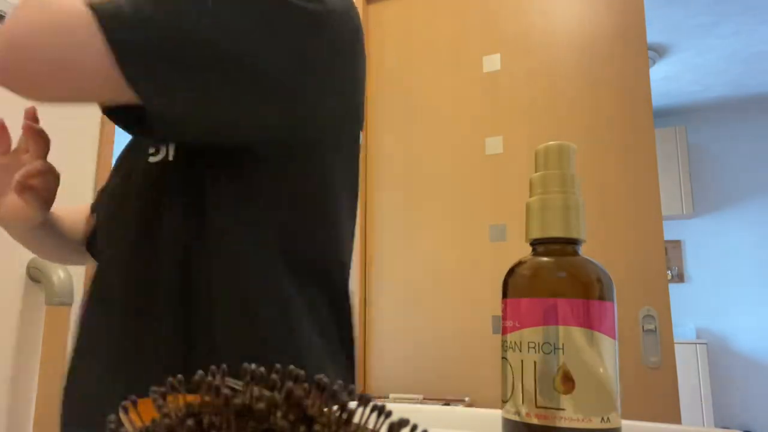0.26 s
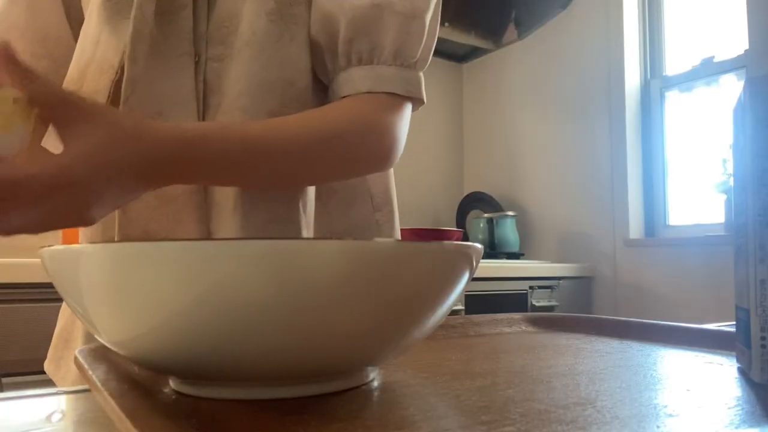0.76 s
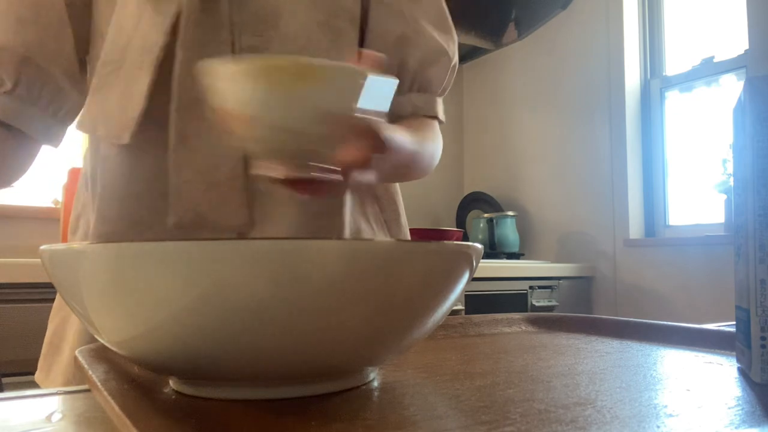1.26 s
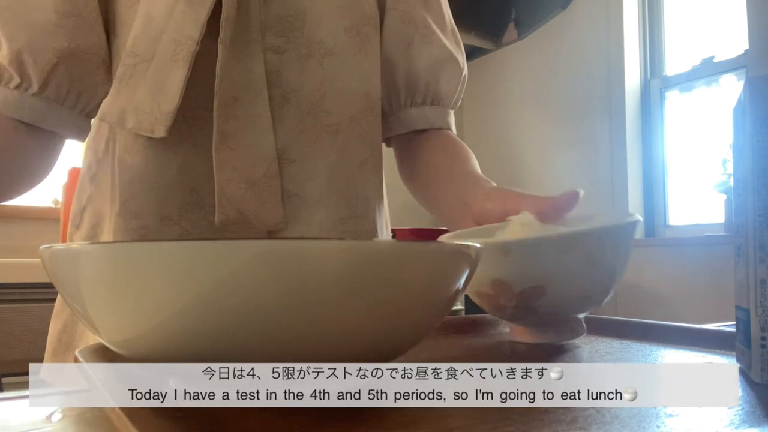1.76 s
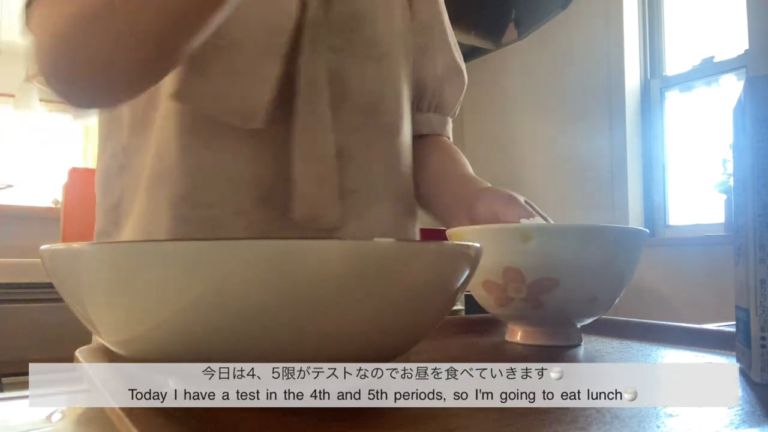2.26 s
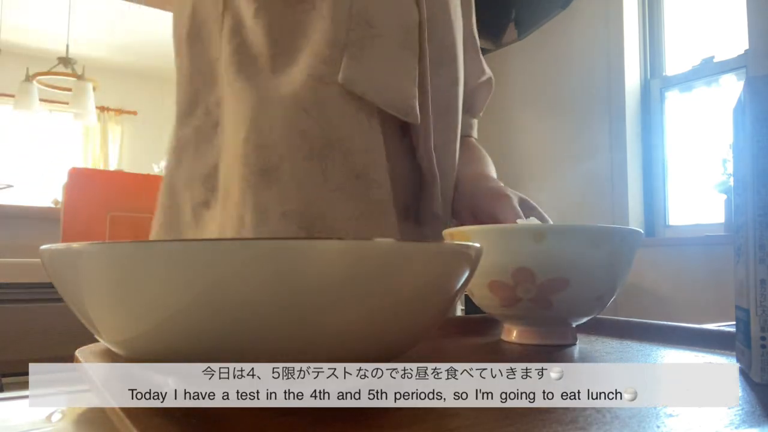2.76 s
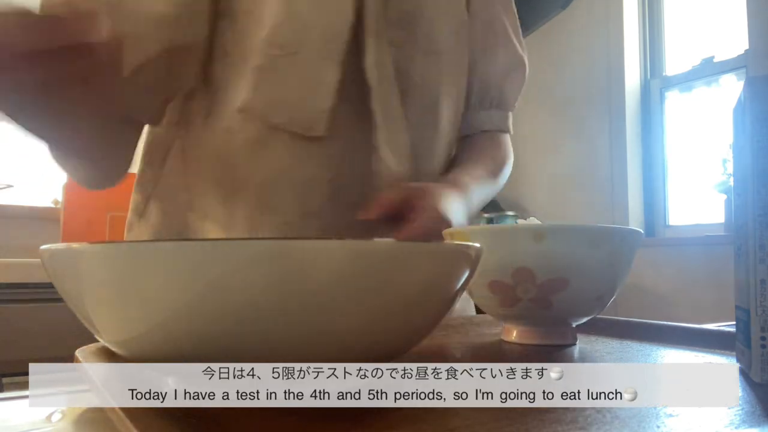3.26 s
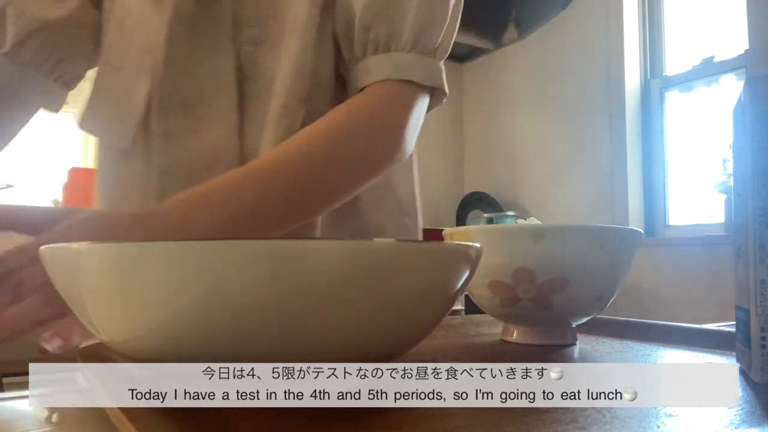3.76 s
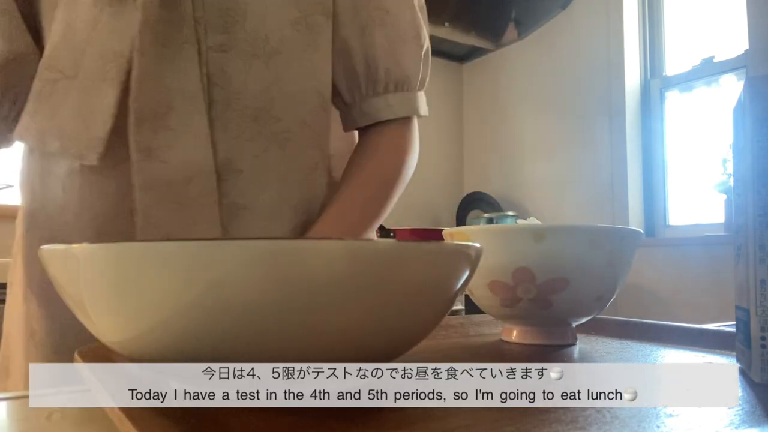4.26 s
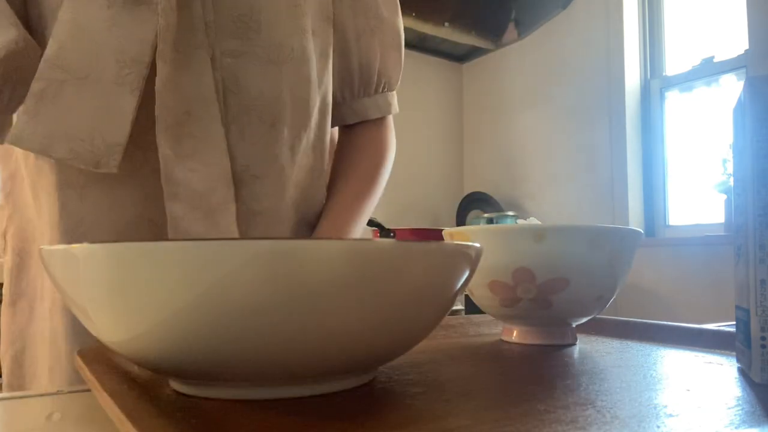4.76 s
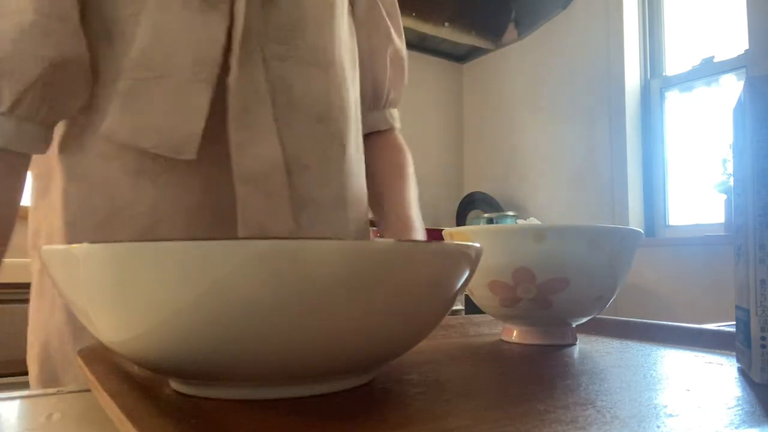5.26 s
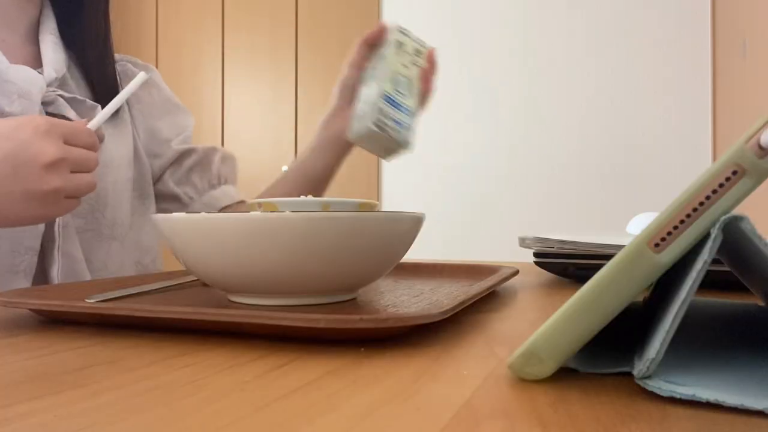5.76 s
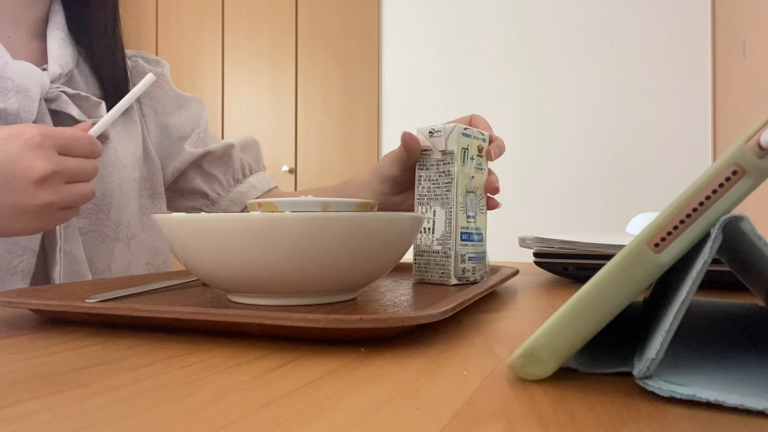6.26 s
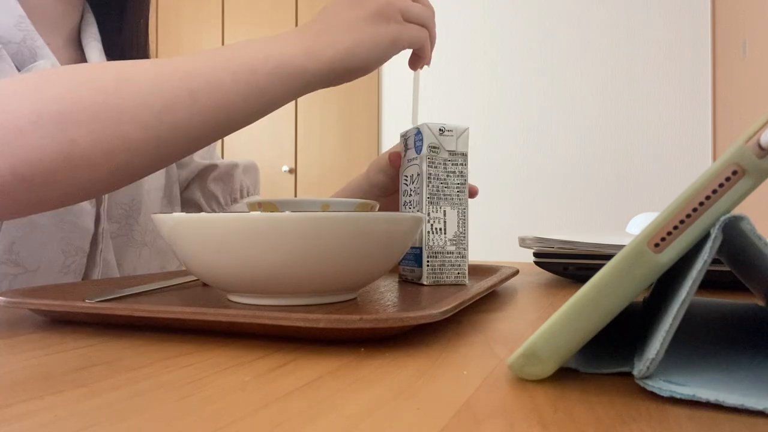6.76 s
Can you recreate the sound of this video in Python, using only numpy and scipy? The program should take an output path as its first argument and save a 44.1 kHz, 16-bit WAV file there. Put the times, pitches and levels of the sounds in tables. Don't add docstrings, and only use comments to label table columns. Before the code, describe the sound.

A brief soft hall hush with faint pipe tones cuts to a kitchen with a low extractor hum. A ceramic bowl strikes wood twice, hard, and settles; chopsticks tap and clack down; a drawer knocks, slides and rattles cutlery. The hum cuts off abruptly into a quiet dining room: crisp wrapper snaps, a dull carton thump on a tray, a faint clock ticking. Close phone microphone on the surface, slight room echo.

```python
import sys
import numpy as np
from scipy import signal
from scipy.fft import rfft, irfft, next_fast_len
from scipy.io import wavfile
from scipy.ndimage import uniform_filter1d

SR = 44100
rng = np.random.default_rng(int(sys.argv[2]) if len(sys.argv) > 2 else 0)


def master_out(mix):
    frames = np.transpose(np.atleast_2d(mix))
    ceiling = np.clip(frames, -1, 1)
    pcm = np.round(ceiling * 32767).astype(np.int16)
    wavfile.write(sys.argv[1], SR, pcm)


def level_to_linear(level):
    exponent = np.asarray(level, float) / 20
    return 10 ** exponent


N = 309141
T = np.arange(N) / SR


def column(table, hz, size=1):
    table = np.array(table)
    return np.interp(np.log(np.maximum(hz, 1)), np.log(table[:, 0]), table[:, size])


def tilt(table, size):
    return level_to_linear(column(table, np.fft.rfftfreq(size, 1 / SR)))


def lean(pan_db):
    return level_to_linear(np.array([[pan_db], [-pan_db]]) / 2)


def add(out, s, pair):
    i = int(s * SR)
    out[:, i:i + pair.shape[1]] += pair[:, :N - i]


def colour(x, table):
    y = irfft(rfft(x) * tilt(table, x.shape[-1]), x.shape[-1])
    return y / y.std()


def band(x, lo_hz, hi_hz):
    edges_hz = [lo_hz, min(hi_hz, SR / 2.2)]
    y = signal.sosfilt(signal.butter(2, edges_hz, "bandpass", fs=SR, output="sos"), x)
    return y / y.std()


def dull(x, top_hz):
    return signal.sosfilt(signal.butter(6, min(top_hz, SR / 2.2), fs=SR, output="sos"), x)


def walk(rate, size=N):
    k = int(SR / rate)
    held = np.repeat(rng.standard_normal(size // k + 1), k)
    return 1.3 * uniform_filter1d(uniform_filter1d(held, k), k)[:size]


def gestures(events, rise_db_s, fall_db_s, size=2, count=16):
    t = T[::count]
    gain = 0
    for e in events:
        before_s = np.maximum(e[0] - t, 0)
        after_s = np.maximum(t - e[0] - e[1], 0)
        gain = gain + level_to_linear(e[size] - rise_db_s * before_s - fall_db_s * after_s)
    return np.interp(T, t, gain)


def near(size):
    a, b = rng.standard_normal((2, size))
    like = 0.78
    return np.array([a, like * irfft(1j * rfft(a), size) + np.sqrt(1 - like ** 2) * b])


# centre_hz, likeness (-1..1), left_minus_right_db
PORTS = [(60, 1, -3.5), (152, 0.67, -5.5), (300, 0.58, 0.5), (680, -0.56, -0.5), (1400, 0.036, -1.5),
         (3000, -0.17, -0.5), (8000, 0.65, 2.5)]


def bands(table, size):
    octave = np.log2(np.maximum(np.fft.rfftfreq(size, 1 / SR), 1))
    mid, side = rfft(rng.standard_normal((2, size))) * tilt(table, size)
    for centre in np.arange(np.log2(30), np.log2(17000), 1 / 2):
        hz = 2 ** centre
        shape = np.cos(np.pi * np.clip(octave - centre, -1 / 2, 1 / 2)) ** 2
        like = np.clip(column(PORTS, hz), -1, 1)
        m, s = np.sqrt(1 + like) * mid, np.sqrt(1 - like) * side
        yield hz, lean(column(PORTS, hz, size=2)) * irfft(shape * np.array([m + s, m - s]), size)


def rings(events):
    out, t = np.zeros((2, N)), np.arange(SR // 7) / SR
    for s, db, hz, t60, pan_db in events:
        turn = np.arccos(np.clip(column(PORTS, hz), -1, 1)) * np.array([[0], [1]])
        turn = turn + 0.92 * walk(120, size=len(t))
        swell = level_to_linear(db - 60 * t / max(t60, .005)) * (1 - np.exp(-t * hz))
        add(out, s, swell * np.sin(2 * np.pi * hz * t + turn) * lean(pan_db))
    return out


def clicks(events, spread, ring_s):
    out, t = np.zeros((2, N)), np.arange(SR // 5) / SR
    for s, db, hz, pan_db in events:
        snap = band(near(len(t)), hz / spread, hz * spread) * np.exp(-t / ring_s)
        add(out, s, snap / abs(snap).max() * level_to_linear(db) * lean(pan_db))
    return out


def blows(events, modes, crack_s, crack_hz, crack_db_more, grit_s, grit_db, board_pan_db, body_db_more,
          bend=.045, cycles=280):
    out, t = np.zeros((2, N)), np.arange(SR // 5) / SR
    hz, db, t60 = (c[:, None] for c in np.transpose(modes))
    t60 = np.minimum(t60, cycles / hz)
    part = np.searchsorted([280, 900, 2800], hz[:, 0])  # board, body, ring, crack (Hz)
    for s, ring_db, board_db, crack_db, pan_db in events:
        body_db = (ring_db + board_db) / 2 + body_db_more
        chance = rng.standard_normal((3, len(modes), 1))
        noise = colour(np.array([near(len(t)) for _ in range(3)]), modes)
        late = np.maximum(t - bend / np.sqrt(hz), 0)
        decay = level_to_linear(db + 3.4 * chance[0] - 60 * late / np.maximum(t60, .01))
        swell = (1 - np.exp(-late * hz / 0.87)) * decay
        phase = 2 * np.pi * hz * (1 + 0.0053 * chance[1]) * late
        turn = np.arccos(np.clip(column(PORTS, hz), -1, 1)) * (1 + 0.22 * chance[2])
        sound = swell * np.array([np.sin(phase), np.sin(phase + turn)])
        board, body, ring, crack = (sound[:, part == k].sum(axis=1) for k in range(4))
        grit = level_to_linear(grit_db) * np.exp(-t / grit_s) * (1 - np.exp(-t / 0.0011))
        body = body / abs(body).max() + grit * band(noise[0], 210, 900)
        ring = ring / abs(ring).max() + grit * band(noise[1], 690, 2500)
        snap = band(noise[2] + 6 * (t == 0), 2700, crack_hz) * np.exp(-t / crack_s)
        crack = crack / abs(crack).max() + level_to_linear(crack_db_more) * snap
        parts = [(board * lean(board_pan_db), board_db + 7), (body * lean(board_pan_db), body_db + 12.0),
                 (ring, ring_db), (crack, crack_db + 5.5)]
        add(out, s, lean(pan_db) * sum(p / abs(p).max() * level_to_linear(d) for p, d in parts))
    return out


# centre_hz, wander_db
FLICKER = [(300, 2.5), (2000, 0.5), (9000, 1.7), (12000, 1.5)]


def air(table, db, size, pan_db):
    out = 0
    for hz, pair in bands(table, next_fast_len(size)):
        out = out + level_to_linear(column(FLICKER, hz) * walk(2.96, size=size)) * pair[:, :size]
    return out / out.mean(axis=0).std() * level_to_linear(db) * lean(pan_db)


# pitch_hz, level_db, waver_db, left_minus_right_db, left_lead_rad
FAN_TONES = [(59.75, -40.6, .3, -1.5, 0), (170.5, -39.5, .8, -5, -.45), (240, -51.5, 2, -5, -.1),
             (2199, -69.5, 2, -2, 2.2), (150, -52, 3, -5, -.4), (87, -62, 3, -2, 0), (299, -61, 3, -2, -.5),
             (345, -58, 3, 0, -.8), (2390, -80, 3, -2, 2.6), (1728, -81, 3, -3, 2.6)]
# low_hz, high_hz
WHINE_HZ = (2250, 2450)


def fan():
    out = 0
    sides = np.array([[1], [-1]]) / 2
    for hz, db, waver_db, pan_db, lead in FAN_TONES:
        phase = 2 * np.pi * hz * T + 0.39 * waver_db * walk(5)
        level = np.sqrt(2) * level_to_linear(db + waver_db * walk(8.4))
        out = out + level * lean(pan_db) * np.sin(phase + lead * sides)
    return out + level_to_linear(-72.5 + 2 * walk(9.9)) * band(rng.standard_normal((2, N)), *WHINE_HZ)


# start_s, peak_db, pitch_hz, t60_s, left_minus_right_db
LATE_RINGS = [(.005, -57, 715, .25, 0), (.082, -55, 720, .2, 2), (.15, -59, 626, .25, 0),
              (.24, -62, 604, .25, -2), (.3715, -52, 620, .02, 1), (1.6124, -16, 1335, .07, -4.5),
              (1.6126, -20.5, 987.5, .07, -4.5), (1.6124, -22, 3210, .025, -3),
              (1.7203, -17, 994, .12, -4.5), (1.7203, -19, 1586, .06, -3), (1.7205, -24.5, 4475, .03, -2),
              (1.734, -24.5, 1320, 0.13, -2.5), (2.651, -21.5, 300, 0.099, -5),
              (2.654, -46, 7880, 0.098, -2), (1.7205, -16, 904, .04, -3.5),
              (2.7055, -16, 2308, 0.044, -0.5), (2.7105, -12, 2320, .045, -1),
              (2.7055, -21, 4310, 0.027, -1), (2.7055, -29.5, 5380, 0.018, -1.5),
              (2.71, -23.5, 2980, .04, -4.5), (4.8575, -18.5, 1300, 0.031, -3),
              (4.868, -25.5, 138, 0.11, -7), (4.878, -24.5, 125.8, .1, -6.5), (6.028, -31, 840, .04, -2),
              (6.028, -31, 1690, .025, -4), (6.04, -44, 916, 0.15, -5)]
# start_s, peak_db, centre_hz, left_minus_right_db
DRY_GLINTS = [
    (.3722, -62, 9000, 0),
    (6.028, -58, 12800, 0),
    (6.043, -51, 12750, 0),
    (6.053, -64, 12800, 0),
    (6.169, -61, 2300, -3),
]


def pipes_and_late_rings():
    return rings(LATE_RINGS) + clicks(DRY_GLINTS, spread=1.3, ring_s=.002)


# start_s, hold_s, level_db
STROKES = [
    (.2, 0.12, -68),
    (.724, 0, -81),
    (1.1, 0.13, -74.5),
    (2.15, 0, -81),
    (2.24, 0, -65),
    (2.3, 0.12, -74),
    (3.01, 0.1, -77),
    (3.39, 0.15, -71),
    (4.58, 0.15, -65.5),
    (6.2, 0.0058, -71.5),
]
# start_s, hold_s, level_db
SHAKES = [
    (4.206, 0.026, -45),
    (4.542, 0.0087, -59),
    (4.762, 0.0076, -34.5),
    (4.86, 0.0025, -40),
    (5.058, 0, -58),
    (6.03, 0.018, -68),
]
# centre_hz, density_db
CLOTH_COLOUR = [(1500, -12.5), (3000, 1.5), (6000, -3.5), (9500, -3), (13000, -14.5), (15500, -17.5)]


def cloth():
    grain = level_to_linear(np.clip(1.2 * walk(23) + 2.7 * walk(600), -6, 5))
    moves = gestures(STROKES, rise_db_s=178.5, fall_db_s=167)
    moves = moves + gestures(SHAKES, rise_db_s=3003, fall_db_s=185)
    return moves * grain * colour(near(next_fast_len(N)), CLOTH_COLOUR)[:, :N]


# start_s, hold_s, rumble_db, scrape_db
DRAWER_PUSHES = [
    (4.225, 0.013, -27.5, -47.5),
    (4.42, 0.44, -49, -53),
    (4.8, 0.0085, -35, -36.5),
    (4.888, 0.012, -33, -44),
    (5.07, 0.017, -52.5, -51.5),
]
# start_s, hold_s, rumble_db, scrape_db
CARTON_PUSHES = [
    (6.04, 0.0062, -36, -42.5),
    (6.1, 0.082, -49, -49.5),
    (6.215, .01, -50, -75.5),
]
# start_s, hold_s, level_db
ROCKS = [
    (6.042, 0.013, -36),
    (6.218, 0.012, -40.5),
    (6.3, 0.023, -55),
]


def slides():
    rumble = band(rng.standard_normal(N), 64, 229) * lean(-6.5)
    noise = rng.standard_normal((2, N)) * level_to_linear(2.0 * walk(60))
    drawer_rumble, drawer_scrape = (gestures(DRAWER_PUSHES, 278, 181.5, size=k) for k in (2, 3))
    carton_rumble, carton_scrape = (gestures(CARTON_PUSHES, 3003, 181.5, size=k) for k in (2, 3))
    sway = np.sqrt(2) * np.sin(2 * np.pi * 55.3 * T) * lean(-6.5)
    return ((drawer_rumble + carton_rumble) * rumble
            + drawer_scrape * band(band(noise, 950, 1650), 950, 1655)
            + carton_scrape * band(noise, 400, 750)
            + gestures(ROCKS, rise_db_s=3003, fall_db_s=211) * sway)


CLOCK_RUNS_S = (5.6145, 6.4165)
BEAT_SCATTER_DB = [7, 3, 0, -2, -3, -3, -1, -3, -.5, -2, 3.5, -4]


def clock(count=7):
    beat_s, tock_late_s = .1251, .002
    order = [(s + k * beat_s + k % 2 * tock_late_s, k % 2) for s in CLOCK_RUNS_S for k in range(count)]
    events = []
    for (s, k), more_db in zip(order, BEAT_SCATTER_DB):
        db, hz = ((-65.5, 1900), (-67.5, 1800))[k]
        events.append((s, db + more_db, hz, 0.031, -9))
    return rings(events)


# start_s, peak_db, pitch_hz, t60_s, left_minus_right_db
TRAY_RINGS = [(4.9, -52, 4470, .015, -1), (5.581, -43.5, 4400, 0.011, -1), (5.581, -33, 6000, 0.0092, -1),
              (6.019, -41, 740, 0.068, -11), (5.5, -55, 1750, .05, 0), (6.075, -49, 1800, 0.076, -3),
              (6.07, -29, 120, 0.15, -4), (6.098, -56, 2300, 0.056, 0), (6.149, -48, 1200, 0.11, -10),
              (6.8, -41, 310, 0.051, -6)]
# start_s, peak_db, centre_hz, left_minus_right_db
TRAY_TAPS = [(5.4995, -45.5, 1305, -2), (6.0185, -47, 997, -2), (6.0272, -23.5, 1040, -3),
             (6.0274, -39.5, 2250, 4), (6.1682, -43, 975, 3), (6.1688, -35, 417, -1),
             (6.1692, -62, 2400, 4), (6.2068, -56, 1700, -3), (6.0268, -45, 3500, -2),
             (6.028, -36, 1650, 3), (6.2068, -62, 3180, -3), (6.364, -67, 2200, -5)]


def tray():
    return rings(TRAY_RINGS) + clicks(TRAY_TAPS, spread=1.16, ring_s=0.0038)


# start_s, ring_db, board_db, crack_db, left_minus_right_db
CARTON = [
    (6.0257, -25, -28.5, -56, -6),
    (6.1657, -47.5, -41, -72, -6),
    (6.206, -58, -41.5, -62, -10),
    (6.2194, -53, -44.5, -72, -1),
]
# pitch_hz, level_db, t60_s
CARTON_MODES = [(118.2, -0.5, 0.13), (131.4, 3, 0.11), (250, -17, 0.053), (406, 0, 0.039),
                (457, -2.5, 0.027), (716, -5, 0.016), (903.6, -7, 0.048), (1400, -6, 0.02),
                (2250, -13, 0.021), (3140, -15, 0.011), (3700, -20, .015), (6600, -12, .01)]
# start_s, peak_db, centre_hz, left_minus_right_db
FLAP = [
    (6.043, -42.5, 7440, 0),
    (6.053, -55, 7000, 0.0057),
]


def carton():
    landing = blows(CARTON, CARTON_MODES, crack_s=0.0023, crack_hz=4030, crack_db_more=-5, grit_s=0.0029,
                    grit_db=-2.5, board_pan_db=2.0, body_db_more=-2.5, bend=0.0895)
    return landing + clicks(FLAP, spread=1.2, ring_s=0.003)


# start_s, peak_db, centre_hz, left_minus_right_db
WRAPPER = [
    (5.473, -28, 7470, -2),
    (5.4994, -33, 3500, -1),
    (5.5814, -33.5, 8000, -1.2),
    (5.8816, -43.5, 6850, -1.2),
]
# start_s, peak_db, centre_hz, left_minus_right_db
CRINKLE = [
    (5.4728, -38, 8500, 0),
    (5.585, -47, 9400, -5),
]


def wrapper():
    snaps = clicks(WRAPPER, spread=2.4, ring_s=0.00034)
    snaps = snaps + level_to_linear(-1.0) * clicks(WRAPPER, spread=38, ring_s=0.0044)
    paper = snaps + clicks(CRINKLE, spread=1.5, ring_s=0.022)
    return np.where(T > 5.8, dull(paper, top_hz=8500), paper)


# start_s, ring_db, board_db, crack_db, left_minus_right_db
DRAWER = [
    (3.8314, -35.5, -36, -62.5, 1.7),
    (3.8506, -45, -37.5, -72, -2),
    (4.2045, -18, -28.5, -38, -1),
    (4.2834, -28, -39, -50, 0),
    (4.3511, -29.5, -38.5, -67, -2),
    (4.4344, -40.5, -54, -59, 0.82),
    (4.764, -14, -24.5, -26.5, -1),
    (4.856, -19.5, -29.5, -30, -0.21),
    (4.8895, -67, -24.5, -43.5, 0),
    (5.058, -32, -43.5, -66.5, 1),
]
# pitch_hz, level_db, t60_s
DRAWER_MODES = [(85.3, -6.5, 0.24), (135.6, 2, 0.085), (229, -7, 0.15), (322.4, -3, 0.051),
                (539.6, -3.5, 0.18), (916, -1.5, 0.18), (1210, 1, 0.047), (1348, 0, 0.097),
                (1506, -6.5, 0.16), (2370, -3, 0.059), (3720, -5, .03), (4940, -1, 0.025), (8240, 1, 0.041)]
# start_s, peak_db, centre_hz, left_minus_right_db
CUTLERY = [
    (3.6533, -51, 5420, 3),
    (3.665, -45, 5900, -3),
    (3.9072, -53, 4440, -2),
    (4.0584, -59, 3340, -6),
    (4.521, -53, 4110, 0),
    (4.5414, -31, 4360, 3),
    (4.542, -33, 2220, -1),
    (4.6963, -39, 3010, 18.5),
]
# start_s, peak_db, centre_hz, left_minus_right_db
RATTLE = [
    (4.207, -48, 11060, -2),
    (4.543, -57, 10830, 5.5),
    (4.697, -48.5, 12000, 2),
    (4.764, -20, 11400, 4),
    (4.86, -41.5, 10750, 0.5),
]
# start_s, peak_db, centre_hz, left_minus_right_db
HOLLOW = [
    (4.211, -26.5, 1400, .1),
    (4.353, -43.5, 930, -2),
    (4.7655, -35, 1340, .1),
    (4.8575, -30, 1340, 0.27),
]


def drawer():
    knocks = blows(DRAWER, DRAWER_MODES, crack_s=0.011, crack_hz=15550, crack_db_more=-11.5, grit_s=0.035,
                   grit_db=-5.5, board_pan_db=-2.5, body_db_more=-8)
    loose = clicks(CUTLERY, spread=1.45, ring_s=0.0032) + clicks(RATTLE, spread=1.4, ring_s=0.025)
    return knocks + loose + clicks(HOLLOW, spread=1.06, ring_s=0.026)


# start_s, peak_db, centre_hz, left_minus_right_db
TOUCHES = [
    (1.588, -31, 1500, -4),
    (4.752, -37, 1800, 7),
    (4.541, -39, 2200, -1),
    (4.698, -37.5, 1700, -14),
]
# start_s, peak_db, centre_hz, left_minus_right_db
GLINTS = [
    (1.588, -44, 8500, -1.5),
    (1.6125, -49, 12520, 0.5),
    (1.7225, -28, 12760, -0.5),
    (1.876, -45, 12500, 0),
    (2.6482, -42, 13000, -1),
    (2.6748, -49.5, 13460, -0.5),
    (2.706, -40, 13000, 1),
]


def contacts():
    return clicks(TOUCHES, spread=2.0, ring_s=0.023) + clicks(GLINTS, spread=1.1, ring_s=.004)


# start_s, peak_db, centre_hz, left_minus_right_db
SPLASH = [
    (1.6122, -22.5, 2600, -2),
    (1.7198, -18.5, 2578, -2),
    (2.6478, -34, 6000, -2),
    (2.675, -29, 5020, -3.5),
    (2.7052, -19, 2180, 0),
    (4.7632, -30, 5700, -0.5),
    (4.856, -36.5, 3000, 0.5),
]


def splash():
    return clicks(SPLASH, spread=2.7, ring_s=.005)


# start_s, ring_db, board_db, crack_db, left_minus_right_db
STICKS = [
    (2.6484, -32.5, -27.5, -36.5, -6),
    (2.6748, -19.5, -21, -24, -4),
    (2.7051, -1.5, -23, -32.5, -2.5),
]
# pitch_hz, level_db, t60_s
STICK_MODES = [(73, -10, 0.084), (185.3, 1.5, 0.067), (348, -4.5, 0.042), (534, -2.5, 0.032),
               (726, -7.5, 0.017), (1531, -12.5, 0.058), (2268, -12, 0.048), (2346, -3.5, 0.0403),
               (3060, -7.5, 0.049), (3700, -4.5, 0.1), (5170, -1.5, 0.013), (8200, -12, 0.03),
               (9200, -16.5, .07), (12960, -23.5, .05)]
# pitch_hz, level_db, t60_s
DROP_MODES = [(72.24, -9.5, 0.083), (182.9, 0, .05), (351, 0, 0.093), (534, -2, 0.026), (738, 0, 0.055),
              (1050, -6, 0.033), (1519, -5, 0.056), (2052, -12.5, .06), (2297, -0.5, 0.048),
              (2400, -6.5, 0.047), (2980, -1.5, .05), (3087, 1, 0.03954), (3650, 0.5, .06), (4310, -3, .04)]


def sticks():
    tips = blows(STICKS[:2], STICK_MODES, crack_s=0.0039, crack_hz=12000, crack_db_more=-12.5, grit_s=0.014,
                 grit_db=-8.0, board_pan_db=-1.0, body_db_more=-0.5, bend=.03, cycles=540)
    drop = blows(STICKS[2:], DROP_MODES, crack_s=0.0055, crack_hz=8000, crack_db_more=-4.0, grit_s=0.0084,
                 grit_db=-3, board_pan_db=-1.5, body_db_more=-11.5, bend=0.029)
    return tips + drop


# start_s, ring_db, board_db, crack_db, left_minus_right_db
BOWL = [
    (1.6122, -6.5, -17.5, -15.5, -2.5),
    (1.72, -3, -18, -15.5, -2),
    (1.8622, -24.5, -30.5, -42, -2.5),
    (1.8749, -33.5, -25, -28, -4.5),
]
# pitch_hz, level_db, t60_s
BOWL_MODES = [(87, -4, 0.12), (133.5, -3.5, 0.11), (278.1, -3, 0.06), (434, 3.5, 0.026),
              (548.5, -7.5, 0.064), (703, -9, 0.048), (981.4, -3, 0.053), (1340, -3, 0.041),
              (1558, -5, 0.04), (2180, -8.5, 0.03), (3210, -6, 0.022), (3500, -5, .018), (3782, -3.5, 0.03),
              (4470, -7, 0.02)]


def bowl():
    hard = blows(BOWL[:2], BOWL_MODES, crack_s=0.0038, crack_hz=6507, crack_db_more=-9.0, grit_s=0.0063,
                 grit_db=-4.0, board_pan_db=-4.0, body_db_more=-5.5, bend=.05)
    soft = blows(BOWL[2:], BOWL_MODES, crack_s=0.0025, crack_hz=7000, crack_db_more=1.5, grit_s=0.0056,
                 grit_db=2.5, board_pan_db=-3.5, body_db_more=0.0, cycles=68)
    return hard + soft


# start_s, peak_db, pitch_hz, t60_s, left_minus_right_db
RIM = [(1.6123, -10.5, 1534, 0.035, -9), (1.6128, -15.5, 3500, 0.02, -3),
       (1.6128, -7.5, 510.5, 0.054, -7.5), (1.6135, -17.5, 747, .05, -5.5), (1.622, -14, 266, 0.061, -6),
       (1.712, -39, 1548, 0.033, -1), (1.7203, -12, 1317, 0.077, -3.5), (1.7205, -21, 3770, 0.033, -1.5),
       (1.721, -20.5, 2170, 0.035, -2.5), (1.721, -13, 714, 0.085, -6.5), (1.733, -15.5, 232.5, .1, -6.5),
       (1.8635, -20.5, 473, 0.044, -6), (1.878, -16.5, 449, 0.073, -9), (1.887, -19, 150.8, .1, -4.5)]
# start_s, peak_db, pitch_hz, t60_s, left_minus_right_db
STICK_RINGS = [(2.6482, -14, 504, 0.037, -10), (2.6495, -34, 2400, 0.042, -3.5),
               (2.6495, -30.5, 4970, .022, -6.5), (2.6485, -37.5, 3636, .14, -2.5),
               (2.649, -40, 18000, 0.15, -3), (2.676, -18, 2370, .04, -6), (2.6755, -35.5, 7865, 0.1, -2.5),
               (2.676, -45, 12900, .09, -2), (2.689, -28.5, 2380, 0.033, -3.5),
               (2.697, -30.5, 2380, .04, -8.5), (2.7055, -35.5, 9020, 0.02, -1),
               (2.7055, -47, 12200, 0.028, -2.5), (2.7185, -19.5, 2320, 0.0499, -2.5),
               (2.719, -28, 3600, 0.067, -4.5)]
# start_s, peak_db, pitch_hz, t60_s, left_minus_right_db
DRAWER_RINGS = [(3.832, -42, 1500, 0.026, 0), (4.207, -21.5, 1400, .05, -1), (4.2074, -16, 300, 0.064, -5),
                (4.2075, -31, 2020, .05, -9), (4.215, -26, 940, 0.22, 2), (4.351, -31.5, 1400, 0.043, -6),
                (4.358, -31, 930, 0.23, -3.5), (4.672, -38.5, 1400, 0.061, -1), (4.702, -31, 1025, .05, -4),
                (4.702, -28, 519, 0.089, -4.5), (4.7653, -18, 1325, 0.059, 4.5), (4.768, -23, 549, 0.1, 1),
                (4.776, -30.5, 2450, 0.08, -3), (4.8, -22.5, 130, .1, -5), (4.826, -27.5, 130, 0.083, -5.5),
                (4.893, -16, 135, 0.13, -8), (4.8574, -18, 1283, 0.049, 0)]


def clean_rings():
    return rings(RIM + STICK_RINGS + DRAWER_RINGS)


# centre_hz, density_db, t60_s
ECHO = [(100, 0, 0.8), (394, 6.5, 0.13), (1500, -1.5, 0.39), (4000, -4.5, 0.49), (8700, -4.5, 0.52),
        (11500, 1.5, 0.54), (14470, 2.5, 0.4)]


def echo(x, db):
    t = np.arange(SR // 2) / SR
    tail = sum(level_to_linear(-60 * t / column(ECHO, hz, size=2)) * pair for hz, pair in bands(ECHO, len(t)))
    tail = tail * (1 - np.exp(-t / 0.003))
    tail = tail / np.sqrt(np.sum(tail ** 2) / 2)
    return x + level_to_linear(db) * signal.fftconvolve(x, tail, axes=1)[:, :x.shape[1]]


CHANGES_S = (.3725, 5.4725)
# centre_hz, density_db
HALL = [(18, -35), (30, -11.5), (81, 2), (171, -8), (320, -8), (662, 0.5), (716, 0.5), (1100, -9.5),
        (1480, -20.5), (4000, -27.5), (8690, -41), (13200, -51), (15000, -54)]
# centre_hz, density_db
KITCHEN = [(30, -30.5), (72, -19), (105, -12), (150, -2.5), (200, -2), (270, -14.5), (345, -2),
           (420, -16.5), (540, -12.5), (800, -17), (1500, -29), (1950, -34.5), (3000, -39.5), (4400, -45),
           (4720, -52.5), (5100, -52), (9500, -61.5), (12500, -67)]
# centre_hz, density_db
DINING = [(30, -21), (55, -11), (100, -6.5), (132, -5), (200, -13), (420, -14.5), (800, -27.5), (2000, -41),
          (4000, -48), (4700, -39), (5400, -46.5), (15000, -56)]


def scene():
    a, b = (int(s * SR) for s in CHANGES_S)
    wooden = dull(bowl() + sticks() + splash(), top_hz=10300)
    knocks = wooden + drawer() + contacts()
    clean = clean_rings()
    wood_echo_more, ring_echo_share = 0.53, .5
    kitchen = echo(knocks + ring_echo_share * clean + wood_echo_more * wooden, db=-18)
    kitchen = fan() + kitchen + (1 - ring_echo_share) * clean - wood_echo_more * wooden
    dining = echo((carton() + clock() + tray())[:, b:], db=-12) + echo(wrapper()[:, b:], db=-4.5)
    rooms = np.hstack([air(HALL, -52, size=a, pan_db=-1.0),
                       air(KITCHEN, -44, size=b - a, pan_db=-2.5) + kitchen[:, a:b],
                       air(DINING, -62.5, size=N - b, pan_db=-6.0) + dining])
    return slides() + cloth() + rooms + pipes_and_late_rings()


def roll_off(x):
    return signal.sosfilt(signal.butter(12, 15760, fs=SR, output="sos"), x)


# centre_hz, gain_db
RESPONSE = [(20, -8), (42, 0), (9400, 0), (9900, -7), (10350, -33), (10900, -33), (11400, -4), (12700, 2),
            (14300, -2), (14900, -10), (15500, -40)]


def record(dry):
    size = next_fast_len(N)
    rounded = np.tanh(dry)
    mix = irfft(rfft(rounded, size) * tilt(RESPONSE, size), size)[:, :N]
    return roll_off(mix)


dry = scene()
out = record(dry)
master_out(out)
```